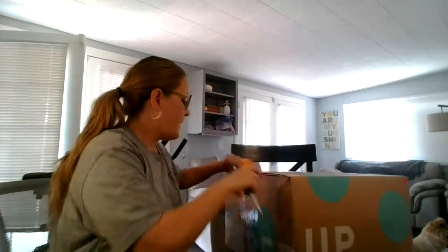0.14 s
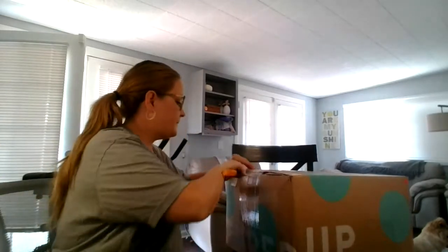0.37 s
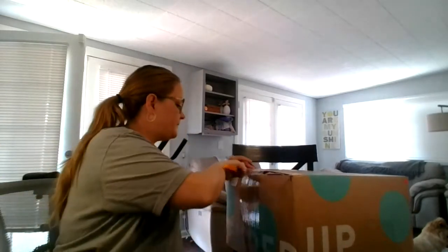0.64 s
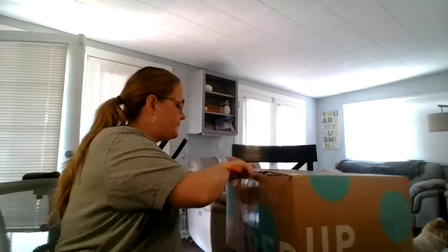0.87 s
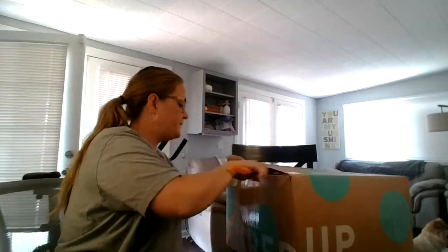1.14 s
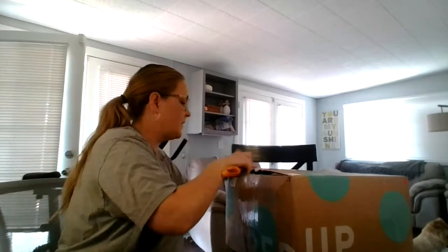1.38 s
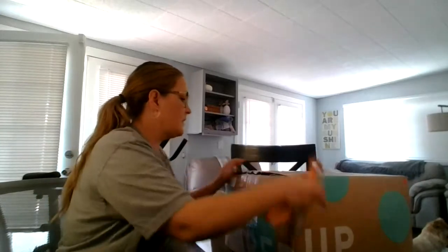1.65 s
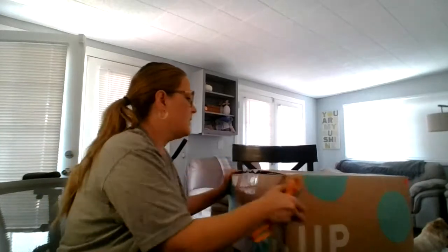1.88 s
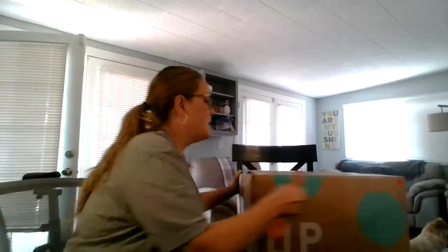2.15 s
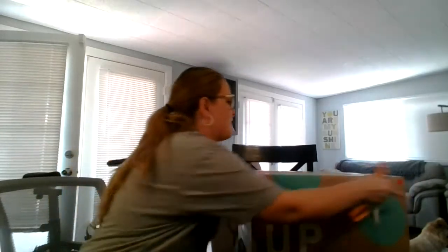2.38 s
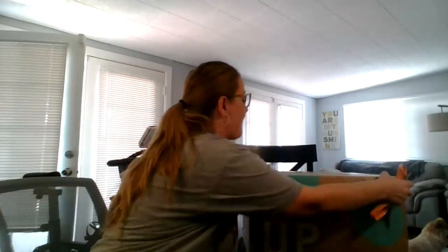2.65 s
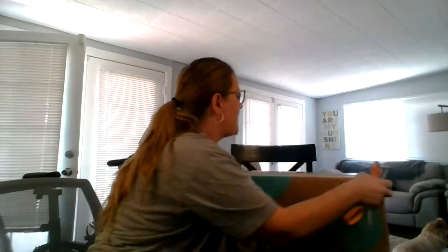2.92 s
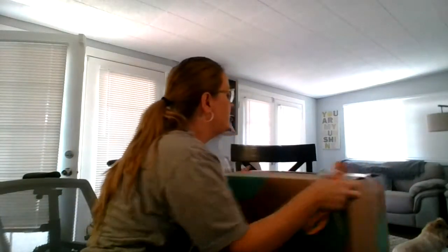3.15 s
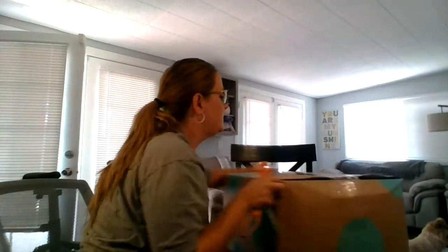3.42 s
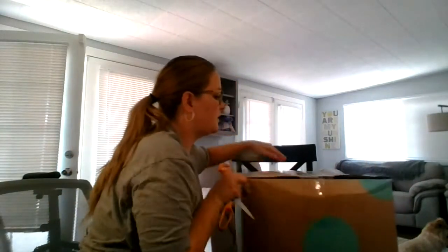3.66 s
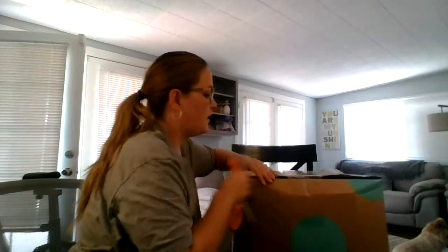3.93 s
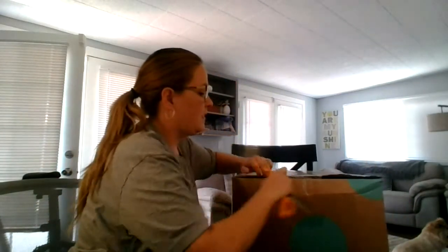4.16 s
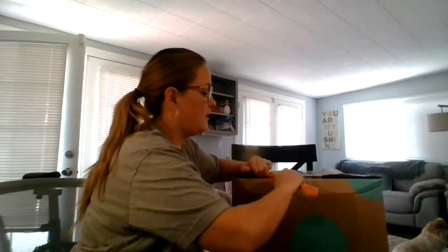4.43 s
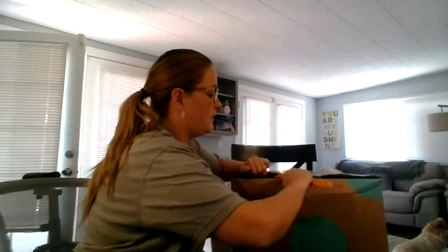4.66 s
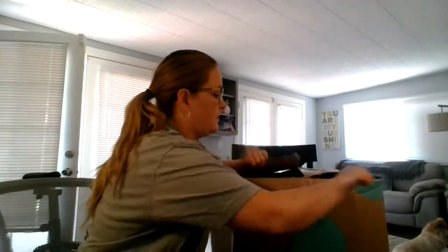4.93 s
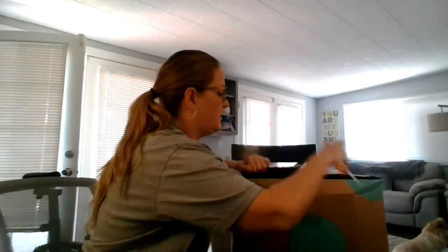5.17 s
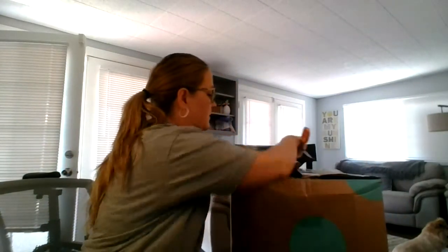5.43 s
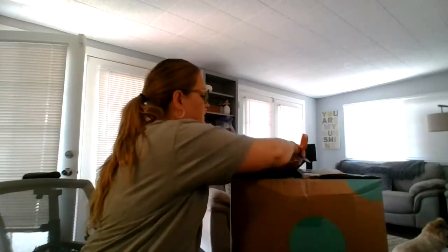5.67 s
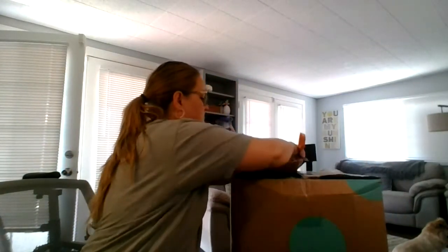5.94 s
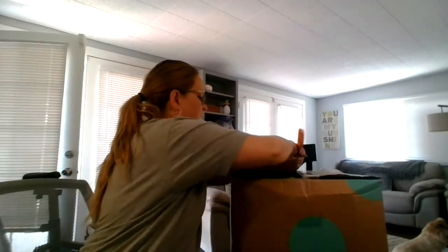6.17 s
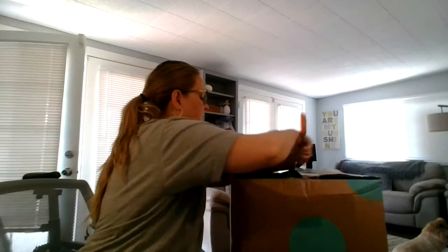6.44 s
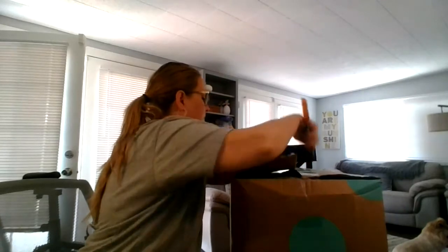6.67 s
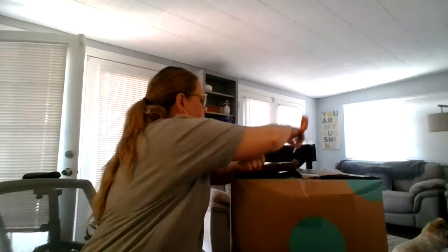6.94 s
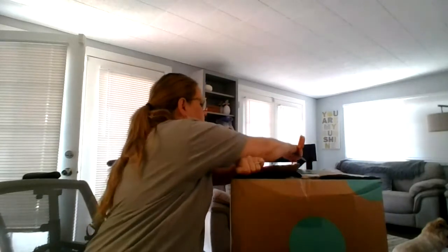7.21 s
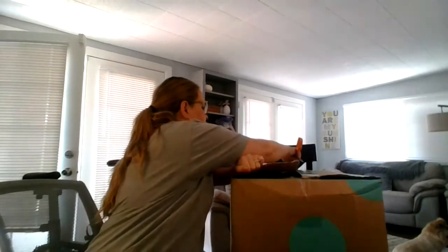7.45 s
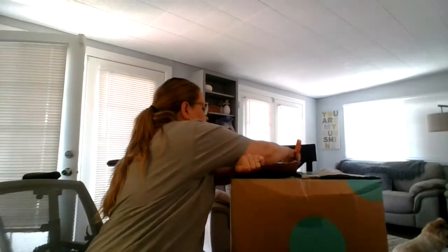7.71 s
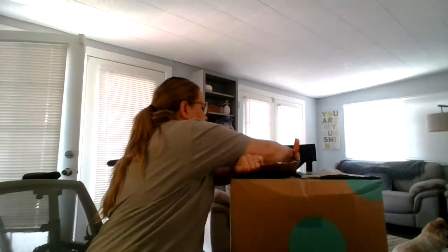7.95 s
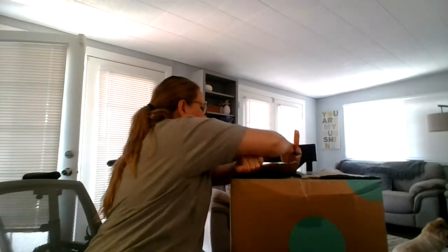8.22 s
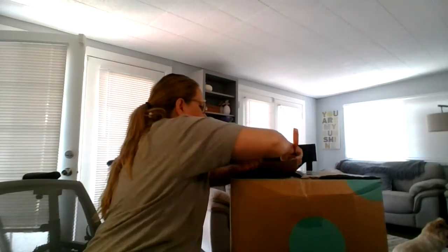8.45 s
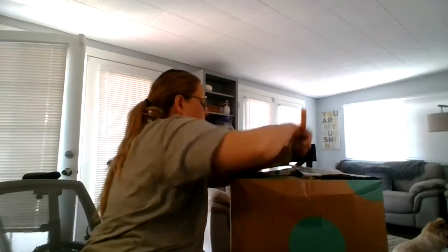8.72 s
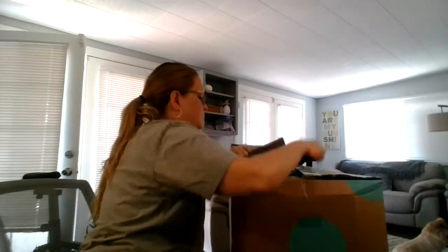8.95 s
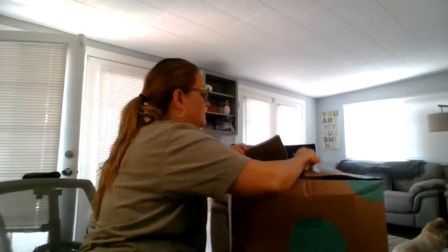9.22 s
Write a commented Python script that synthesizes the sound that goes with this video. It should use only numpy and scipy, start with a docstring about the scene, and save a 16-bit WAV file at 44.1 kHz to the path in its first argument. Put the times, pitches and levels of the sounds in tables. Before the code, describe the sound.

Close microphone in a furnished living room, short soft reflections, with a faint slowly swelling low hum, rumble and thin air throughout. From 0 to 0.6 s, small ticks and light touches on card. At 0.7 s a very loud, sharp tape crack bursts out, followed by more strong cracks and clumped tearing from 0.86 to 1.05 s, with hollow box knocks. From 1.2 to 4.6 s it is much quieter: dull hollow bumps near 1.8, 2.5, 2.8, 3.0 and 4.0 s, hands brushing card, faint scraping and tiny clicks. At 4.7 to 4.9 s, bright snaps, ripping and a short gritty scrape. Bumps at 5.0 and 5.3 s, modest tearing around 6.1 s, a deep thump at 6.4 s, then near calm. From 7.7 s handling resumes: a strong snap at 7.85 s, scrapes and brief rasps, a crackling cluster at 8.4 to 8.6 s, then fading tears and rubbing until about 9.3 s.

```python
"""Scissors slit the packing tape of a large cardboard box and hands pull the flaps open in a living room. Tape
snaps in sharp cracks with short card rings, tears in clumped noise and peels in gliding rasps; a bending flap
groans in low glides. Hands knock the hollow box, a bank of resonances; skin slides in hissing noise and a blade
scrapes in grains. An appliance hums on beating low tones over rumble and faint air; near echoes and a diffuse
tail make the room."""
import sys
import numpy as np
from scipy import signal
from scipy.fft import rfft, irfft, next_fast_len
from scipy.io import wavfile
from scipy.ndimage import uniform_filter1d

SR = 44100
rng = np.random.default_rng(int(sys.argv[2]) if len(sys.argv) > 2 else 0)


def int16_out(signal):
    """Quantize to a 16-bit WAV file."""
    q = np.round(np.clip(np.atleast_2d(signal).T, -1, 1) * 32767)
    wavfile.write(sys.argv[1], SR, q.astype(np.int16))


def voltage_ratio(level):
    """Linear amplitude factor for a level in decibels (scalar or array-like)."""
    return 10 ** (np.asarray(level, float) / 20)


N = 411894

# Tape and card giving way. Each row: start in seconds, crack peak in dB, card ring peak in dB,
# tearing level in dB, tearing t60 in seconds (kept within 0.02 to 1; the steady sag comes on top).
SNAPS = [(.122, -37, -52, -66, .13), (0.2596, -34, -39, -49.5, 0.096), (.3002, -25, -40, -44.5, 0.056),
         (0.373, -37, -32, -43, 0.029), (0.463, -34, -65, -63, .1), (0.5658, -38, -45, -57, .13),
         (0.6879, 5, -12, -25.5, 0.081), (.6934, -15, -25, -31, 0.42), (0.8612, -13.5, -39, -41, 0.032),
         (.9061, -3, -25, -24, 0.28), (.9114, -2, -18.5, -24, 0.38), (.9815, -6, -26, -23.5, 0.078),
         (.9875, -11, -18, -30, .13), (1.0175, -18, -28, -28, .13), (1.0329, -2, -17, -28.5, 0.27),
         (1.1714, -38, -39, -40.5, 0.12), (1.295, -55, -48, -51, 0.39), (1.7715, -27, -50, -45.5, .13),
         (1.7944, -38, -54, -44, 0.61), (1.8494, -46, -32, -49.5, 0.18), (2.099, -51, -43.5, -57, .13),
         (2.499, -42, -38, -54.5, .13), (2.6072, -44, -37, -74, 0.098), (3.01, -40, -41, -67, .1),
         (3.553, -19, -40, -48, .13), (3.5833, -27, -38, -48, 0.2), (3.759, -51, -44, -70, .13),
         (3.7834, -36, -28, -40, 0.079), (3.9007, -37, -38.5, -47, .13), (4.108, -46, -37, -45, 0.18),
         (4.1361, -26, -31, -40.5, 0.03), (4.194, -38, -32, -50.5, 0.054), (4.282, -48, -57, -65, .24),
         (4.515, -46, -34, -62, 0.1), (4.589, -49, -62, -60.5, .13), (4.7055, -8.5, -13.5, -31, .13),
         (4.71, -12, -23, -25.5, 0.15), (4.7476, -16, -17.5, -38.5, 0.29), (4.8515, -35, -39, -40, .13),
         (4.8602, -30, -24, -29, 0.15), (4.874, -18, -13.5, -33, 0.1), (4.9132, -22, -27, -25.5, 0.061),
         (4.9214, -26, -22, -32.5, 0.17), (5.4878, -52, -42, -49.5, 0.59), (5.8506, -39, -60, -55.5, 0.69),
         (5.9226, -29, -41, -47, 0.18), (5.9652, -49, -40, -65, 0.09), (6.0633, -18, -38, -39, 0.22),
         (6.1695, -25, -33, -29.5, .13), (6.177, -24, -25, -33.5, 0.3), (6.3215, -37, -58, -48.5, 0.1),
         (6.465, -25.5, -56, -51, .083), (6.539, -42, -50, -46.5, 0.15), (6.804, -37, -50, -79, 0.081),
         (7.4729, -40, -68, -70, .15), (7.5416, -33.5, -57, -56, .13), (7.568, -40, -52, -51.5, 0.13),
         (7.737, -18, -37, -41.5, 0.18), (7.8411, -29, -38, -31, 0.11), (7.8475, -7.5, -19.5, -34.5, 0.25),
         (8.008, -30, -35, -44, .34), (8.1998, -27, -32, -36.5, 0.76), (8.4384, -22, -35, -33.5, 0.31),
         (8.483, -14, -45, -32, .15), (8.5251, -8, -32, -29, 0.15), (8.554, -9, -49, -30.5, 0.053),
         (8.6914, -24, -55, -44.5, 0.74), (8.8258, -30, -59, -44, 0.18), (8.9698, -29, -45, -46.5, 0.16),
         (9.0900, -36, -58, -46.5, 0.46)]
# Hands and flaps knocking the box. Each row: start in seconds, peak in dB,
# gain of the hard push and gain of the deep push, both in dB against the soft push.
KNOCKS = [(.177, -46.5, -8, 0), (0.262, -42.5, -23, -6), (0.372, -47, 0, -14), (.686, -31, -3, -15),
          (.904, -21, 6.5, -14), (0.983, -18, -3.5, -7), (1.035, -14, 5.5, -4), (1.544, -32.5, -7.5, 1),
          (1.772, -26.5, -4, -33), (1.8, -33.5, -3.5, -24), (2.344, -35, 1, 2), (2.5, -24, -0.5, -17),
          (2.606, -34, 2.5, -12), (2.768, -25, 1, -22), (2.819, -36.5, -2, -4), (2.917, -41, 1, -1),
          (3.008, -27.5, -0.5, -6), (3.062, -39, -2, -4), (3.554, -40.5, -2, -3.5), (3.58, -42.5, 12, 6),
          (3.757, -40, 7, -13), (4.007, -28, -0.5, -6), (4.06, -39.5, -12, -8), (4.186, -53, 22, -1),
          (4.51, -44.5, 1.5, -14), (4.703, -19.5, 0, -5.5), (4.855, -26, 5, -5), (4.915, -27, 1.5, -3),
          (5.004, -27, -1.5, -2), (5.286, -28, 0, -11), (6.063, -31, 1.5, -3), (6.172, -25.5, 13, 3),
          (6.206, -31, -4, -6), (6.377, -22, -7, 2.5), (6.53, -38, 0, -21), (7.103, -38.5, 6, -3),
          (7.746, -34.5, -1, -11), (7.846, -28.5, -1, -3), (8.007, -36, -2, -7), (8.44, -28, 2, -18),
          (8.48, -30.5, -1, 5)]
# Rasps of tape and card peeling from the flap, and two longer low glides as the flap bends. # Each row: start
# in seconds, length in seconds, # starting pitch in Hz, glide in Hz per second, level in dB.
PEELS = [(7.95, .25, 924, 302, -50), (8.0, 0.12, 1220, -300, -57), (7.852, 0.0088, 4890, 100, -38),
         (8.005, 0.022, 2790, 100, -47), (8.005, 0.035, 2140, -100, -49), (8.215, .02, 2920, -2000, -42),
         (8.29, 0.024, 2320, 100, -47), (8.37, 0.068, 2300, -5000, -48.5), (8.484, 0.013, 2680, 114, -43),
         (8.52, 0.01, 2646, -100, -39), (8.53, 0.03, 4360, 100, -41.5), (8.69, 0.0098, 4700, 100, -47.5),
         (8.972, 0.0077, 3770, 101.5, -51.5), (9.12, 0.02, 1950, -100, -54)]
# Skin sliding on card. Each row: start in seconds, length in seconds, level in dB, lift-off in dB per second.
SLIDES = [(0, 0.027, -57.5, 62), (0.162, 0.19, -56, 38), (.76, .2, -53, 44), (1.0, 0.16, -47.5, 189),
          (1.28, 0.14, -58.5, 45), (1.58, 0.32, -49, 47), (2.483, 0.51, -54.5, 45), (2.737, 0.19, -53, 40),
          (2.888, 0.17, -48.5, 23), (3.16, 0.6, -58.5, 17), (3.772, 0.036, -50.5, 150),
          (3.892, .05, -54, 100), (4.001, 0.033, -50, 200), (4.102, 0.074, -52.5, 100),
          (4.278, 0.091, -48, 99), (4.854, 0.093, -36, 200), (5.07, 0.1, -59.5, 125),
          (5.508, 0.19, -52, 66), (5.896, 0.24, -58.5, 35), (6.155, 0.078, -51, 43),
          (6.32, 0.094, -48.5, 72), (6.962, 0.049, -53.5, 79), (7.54, 0.03, -61.5, 103),
          (7.878, 0.15, -46.5, 79), (8.177, 0.26, -42.5, 70), (8.42, 0.087, -40.5, 63),
          (8.8, .2, -52.5, 42), (9.082, .04, -41, 159), (9.18, .3, -52.5, 40)]
# Blade and tape scraping along the box. Each row: start in seconds, length in seconds,
# scraping level in dB, level of the creaking walls in dB.
SCRAPES = [(0, 0.25, -65.5, -65), (0.265, .13, -56.5, -79), (0.504, 0.22, -65, -65),
           (0.73, 0.064, -57, -52), (.97, .06, -61, -63), (1.273, 0.71, -69.5, -67), (1.6, 0.05, -59, -59),
           (1.74, 0.22, -62.5, -67), (2.04, 0.029, -57.5, -67), (2.321, .07, -54.5, -65),
           (2.523, 0.27, -75, -63), (2.77, 0.24, -55, -53.5), (3.05, 0.56, -62.5, -64.5),
           (3.535, 0.79, -64.5, -66), (4.175, 0.033, -48.5, -47.5), (4.494, 0.036, -64, -60),
           (4.851, 0.067, -35.5, -36), (4.91, 0.049, -73, -45), (5.03, 0.045, -74, -75),
           (5.46, 0.23, -66, -61.5), (5.878, 0.22, -65, -56), (6.13, 0.32, -58, -53.5),
           (6.397, 0.036, -52, -58), (7.745, 0.16, -85, -49), (7.9, 0.092, -49, -55),
           (8.02, 0.16, -47.5, -48), (8.184, 0.092, -41, -47.5), (8.3, 0.31, -49, -47.5),
           (8.696, 0.059, -57, -59), (8.942, .45, -61.5, -63.5)]
# Idle hands: the resting levels in dB of sliding, scraping and creaking, in that order.
RESTING_DB = [-76.5, -74.5, -67.5]
# Resonances of the hollow box. Each row: frequency in Hz, width in Hz, relative level in dB.
BOX_MODES = [(126, 27.6, 4), (210.5, 85, 2.5), (237, 86.5, 4.5), (311.4, 72, 1), (381, 67, -1.5),
             (443, 90, 1), (530, 140, -1), (633, 77, 5), (655, 98, 1.5), (1008, 64, -13), (1177, 100, -17),
             (2010, 33, -15.5)]
# Spectra of tearing, sliding, scraping and room air. Each row: frequency in Hz, relative level in dB per Hz.
TEAR_SPECTRUM = [(180, -6), (300, -11.5), (1010, -4), (1390, -5.5), (1640, -3.5), (2070, -2.5),
                 (7820, -3.5), (9390, -6), (12000, -4), (15700, -5.5), (16100, -37)]
SLIDE_SPECTRUM = [(1760, -4), (3000, -3), (6000, -2), (6900, 1), (10400, 0), (13400, -0.5), (15700, 1.5),
                  (16100, -36)]
SCRAPE_SPECTRUM = [(470, -13), (800, -2), (931, -4.5), (1010, -4), (2180, -7.5), (2440, -13), (2810, -7),
                   (3400, -13.5), (9000, -13.5), (11700, -99), (19800, -120)]
AIR_SPECTRUM = [(55, 0), (70, 1), (108, 0), (150, 0), (199, 1), (336, -0.5), (483, -13.5), (1200, -10),
                (1370, -13.5), (4090, -20.5), (14900, -24.5), (16000, -15.5)]
# Mains lines of the hum. Each row: frequency in Hz, mean level in dB.
MAINS = [(120.3, -61), (180.4, -74.5), (240.6, -75)]
# Width of the stereo noise. Each row: frequency in Hz, left-right likeness from 0 to 1.
LIKENESS = [(60, 0.96), (500, 0.83), (1000, 0.79), (2000, 0.33), (5500, 0.15), (7500, 1), (12000, 0.94)]
# Decay curve of the room, which the tail takes a share of. Each row: frequency in Hz, t60 in seconds.
ROOM_T60 = [(100, 0.8), (260, 0.28), (700, 0.38), (1840, 0.38), (4850, 0.28), (12800, 0.089)]
# Nearest surfaces. Each row: delay in seconds, level in dB before panning.
ECHOES = [(.0055, -18.5), (.0065, -32.5), (.012, -45)]
EDGES_HZ = 60 * 2 ** np.arange(0, 8.3, .5)  # half-octave bands

CARD_HZ, CARD_SPREAD_OCTAVES = 890, 0.24  # each snap rings the card at a pitch of its own near this
TEAR_HOLD_S = 0.018  # each tear stays near full level this long, then dies away
TEAR_RISE_S = 0.00082  # rise of the strongest tear
RISE_DB_PER_DB = -0.6  # weaker tears start faster: dB of rise time per dB below the strongest
SHUDDER_T60_S = 0.13  # shudder after a knock that peaks at -30 dB
LONGER_PER_DB = 0.49  # lighter contacts drag and shudder longer: dB of t60 per dB below -30
PEEL_RISE_DB_PER_S, PEEL_FALL_DB_PER_S = 1500, 400
TOUCH_S, SCRAPE_LIFT_DB_PER_S = .04, 130.5  # a stroke swells in, holds, then lifts off
# Two motors run nearly in step around HUM_HZ, so the tone swells and fades
HUM_HZ, HUM_DB, WEAKER_MOTOR_DB = 58.46, -45, -2.5
BEAT_S, FIRST_FADE_S = 2.34, 1.45
DRONE_HZ, DRONE_WIDTH_HZ, DRONE_DB = 49.06, 2.06, -54
RUMBLE_DB, AIR_DB = -45.5, -60


def rms_one(x):
    """Scale to rms 1."""
    return x / np.sqrt(np.mean(x ** 2) + 1e-20)


def at_hz(points, hz):
    """Read a table on a log-frequency axis."""
    table = np.array(points)
    return np.interp(np.log(hz), np.log(table[:, 0]), table[:, 1])


def drift(rate):
    """Slow random wander of spread 1, noise smoothed by two equal poles at rate Hz."""
    r = np.exp(-80 * np.pi * rate / SR)  # one value every 40 samples
    slow = signal.lfilter([1], [1, -2 * r, r * r], rng.standard_normal(N // 40 + 2002))[2000:]
    return np.interp(np.arange(N) / 40, np.arange(len(slow)), rms_one(slow - slow.mean()))


def cut(x, hz, kind, order=2):
    """Butterworth filter."""
    return signal.sosfilt(signal.butter(order, hz, kind, fs=SR, output="sos"), x)


def colour(x, spectrum):
    """Shape a sound to a spectrum table, falling steeply below its first point."""
    size = next_fast_len(x.shape[-1])
    hz = np.maximum(np.arange(size // 2 + 1) * SR / size, 1)
    low_end = 1 / np.sqrt(1 + (spectrum[0][0] / hz) ** 6)
    gain = voltage_ratio(at_hz(spectrum, hz)) * low_end
    gain = gain / np.sqrt(np.mean(gain ** 2))
    return irfft(rfft(x, size) * gain, size)[..., :x.shape[-1]]


def stereo_noise(size, t60_share=None, patchy_db=0):
    """Half-octave noise bands with a set left-right likeness; they may die away or flicker in level."""
    out, white, s = 0, rng.standard_normal((2, 2, size)), np.arange(size) / SR
    for k, (low, high) in enumerate(zip(EDGES_HZ, EDGES_HZ[1:])):
        mid, side = cut(white[k % 2], [low, high], "band")  # neighbouring bands use separate noise
        hz = np.sqrt(low * high)
        alike = np.clip(at_hz(LIKENESS, hz), 0, 1)
        fade = 1
        if t60_share:
            fade = voltage_ratio(-60 * s / (t60_share * at_hz(ROOM_T60, hz)))
        if patchy_db:
            fade = voltage_ratio(patchy_db * drift(12.7))
        out = out + fade * (np.sqrt(1 + alike) * mid + np.sqrt(1 - alike) * side * [[1], [-1]])
    return out


def grains(per_s, spread_db):
    """Random clicks of uneven size and either sign, rms 1."""
    sizes = voltage_ratio(spread_db * np.minimum(rng.exponential(1, N), 5)) * rng.choice([-1, 1], N)
    return rms_one(sizes * (rng.random(N) < per_s / SR))


def snaps():
    """Sudden release of tape: a sub-millisecond crack, a short card ring, then fibres and glue tearing in grains."""
    s, peak_db, ring_db, tear_db, t60 = np.transpose(SNAPS)
    ring_hz = CARD_HZ * 2 ** (CARD_SPREAD_OCTAVES * rng.standard_normal(len(s)))
    cracks, age = np.zeros(N), np.arange(900) / SR
    noises = rng.standard_normal((len(s), 2, len(age)))
    starts = (s * SR).astype(int)
    for i, sharp, dull, hz, (a, b) in zip(starts, voltage_ratio(peak_db), voltage_ratio(ring_db), ring_hz, noises):
        crack = cut(a * age * np.exp(-age / 0.00023), [2200, 17000], "band")
        ring = cut(b * np.exp(-age * hz / 2.05), [hz / 1.53, hz * 1.83], "band")
        cracks[i:i + len(age)] += sharp * crack / np.abs(crack).max()
        cracks[i:i + len(age)] += dull * ring / np.abs(ring).max()
    # the tear runs along the seam, so it is wide; its grains come in clumps
    clumps = uniform_filter1d(np.abs(grains(2500, spread_db=3.0)), size=40)
    fibres = stereo_noise(N, patchy_db=1.2) * (0.15 + clumps)
    tearing = rms_one(colour(fibres, TEAR_SPECTRUM)) * voltage_ratio(2 * drift(55))
    return cracks, tearing * bursts(s, tear_db, TEAR_HOLD_S, np.clip(t60, .02, 1))


def bursts(times, levels_db, hold, t60s):
    """Tearing envelopes that jump up, sag while held, then die away; the loudest rules."""
    out = np.zeros(N)
    for s, level_db, t60 in zip(times, levels_db, t60s):
        i = round(s * SR)
        age = np.arange(min(round((hold + t60) * SR), N - i)) / SR
        rise_s = TEAR_RISE_S * voltage_ratio(RISE_DB_PER_DB * (max(levels_db) - level_db))
        fall_db = 60 * age + 60 * np.maximum(age - hold, 0) / t60
        shape = voltage_ratio(level_db - fall_db) * np.minimum(age / rise_s, 1)
        out[i:i + len(age)] = np.maximum(out[i:i + len(age)], shape)
    return out


def peeling():
    """Uneven slips excite a resonance that glides through each rasp of peeling tape or bend of the flap."""
    out, lead = np.zeros(N), round(.1 * SR)
    slips = rms_one(cut(grains(1100, spread_db=-1.0), 190, "low")) * voltage_ratio(2.6 * drift(25))
    for k, (s, length, hz, glide, level_db) in enumerate(PEELS):
        age = np.arange(-lead, lead + round(length * SR)) / SR
        at = round(s * SR) - lead + np.arange(len(age))
        fall_db = -PEEL_FALL_DB_PER_S * np.maximum(age - length, 0)
        shape_db = level_db + np.minimum(PEEL_RISE_DB_PER_S * age, fall_db)
        tone = np.sqrt(2) * np.sin(2 * np.pi * (hz * age + glide * age ** 2 / 2))
        out[at] += slips[at - k * lead] * tone * voltage_ratio(shape_db)  # each rasp reads its slips at another offset
    return out


def knocks():
    """A contact and a short shudder shake the box: its weight moves the deep mode, the palm the low, edges the high."""
    out, shake, age = np.zeros(N), grains(1500, spread_db=2.5), np.arange(round(.4 * SR)) / SR
    for s, peak_db, hard_db, deep_db in KNOCKS:
        i = round(s * SR)
        t60 = SHUDDER_T60_S * voltage_ratio(LONGER_PER_DB * (-30 - peak_db))
        push = voltage_ratio(-21.5) * rms_one(shake[i:i + len(age)]) * voltage_ratio(-60 * age / t60)
        push[0] += 1  # the contact itself
        deep = cut(push, 150, "low")
        soft = cut(push, [170, 520], "band")
        hard = cut(push, [520, 1300], "band")
        ring = box(soft + voltage_ratio(hard_db) * hard + voltage_ratio(deep_db) * deep)
        out[i:i + len(age)] += voltage_ratio(peak_db) * ring / np.abs(ring).max()
    return out


def box(force):
    """The hollow box rings in parallel two-pole resonances of alternating sign."""
    out = 0
    for k, (hz, width_hz, level_db) in enumerate(BOX_MODES):
        r = np.exp(-np.pi * width_hz / SR)
        zeros = [(1 - r * r) / 2, 0, (r * r - 1) / 2]
        poles = [1, -2 * r * np.cos(2 * np.pi * hz / SR), r * r]
        out = out + (-1) ** k * voltage_ratio(level_db) * signal.lfilter(zeros, poles, force + 1e-18)
    return out


def sliding():
    """Skin hisses on card: wide, patchy noise that flickers under each stroke."""
    wide = rms_one(stereo_noise(N, patchy_db=0.87))
    hiss = rms_one(colour(wide, SLIDE_SPECTRUM)) * voltage_ratio(2.2 * drift(17))
    return hiss * strokes(*np.transpose(SLIDES), RESTING_DB[0])


def scraping():
    """The blade scrapes in dense grains and sets the box walls creaking in their resonances."""
    start, length, scrape_db, creak_db = np.transpose(SCRAPES)
    lift = np.full(len(start), SCRAPE_LIFT_DB_PER_S)
    grit = colour(grains(5000, spread_db=2.0), SCRAPE_SPECTRUM) * voltage_ratio(2.0 * drift(25))
    creak = rms_one(box(grains(1500, spread_db=6.0))) * voltage_ratio(0.83 * drift(7.4))
    grit = grit * strokes(start, length, scrape_db, lift, RESTING_DB[1])
    return grit + creak * strokes(start, length, creak_db, lift, RESTING_DB[2])


def strokes(starts, lengths, levels_db, lifts, rest_db):
    """Envelope of strokes that swell in, hold and lift off, above a resting level; powers add."""
    s, power = np.arange(0, N + 64, 64) / SR, voltage_ratio(rest_db) ** 2
    for start, length, level_db, lift in zip(starts, lengths, levels_db, lifts):
        swell = np.clip((s - start) / TOUCH_S + .5, 0, 1)
        lift_db = lift * np.maximum(s - start - length, 0)
        power = power + (swell * voltage_ratio(level_db - lift_db)) ** 2
    return np.interp(np.arange(N) / SR, s, np.sqrt(power))


def room(x):
    """A few near echoes and a diffuse tail dying band by band; the tail changes as hands and flaps move."""
    size, out = round(.4 * SR), np.zeros((2, N))
    for k, (lag, level_db) in enumerate(ECHOES):
        pan = np.array([[1.15], [.85]])[::(-1) ** k]  # alternate sides
        out += voltage_ratio(level_db) * pan * np.roll(x, round(lag * SR))
    step = 8192
    window = signal.windows.hann(2 * step, sym=False)
    build_up = np.minimum(np.arange(size) / (0.0062 * SR), 1)
    tails = stereo_noise(size, t60_share=0.75) * build_up * voltage_ratio(-34.0)
    # every overlapping piece of sound gets a tail with its own random sign flips
    signs = rng.choice([-1, 1], (N // step + 2, size // 100 + 1))
    padded = np.pad(x, (step, 2 * step))
    wide = np.zeros((2, len(padded) + size + 2 * step))
    for k, flips in enumerate(signs):
        tail = tails * uniform_filter1d(np.repeat(flips, 100)[:size] * 1., size=40)
        piece = padded[k * step:(k + 2) * step]
        reply = signal.fftconvolve((piece * window[:len(piece)])[None], tail, axes=1)
        wide[:, k * step:k * step + reply.shape[1]] += reply
    return out + wide[:, step:step + N]


def appliance_hum():
    """Two motors nearly in step beat slowly, beside wavering mains lines and a narrow noise drone."""
    s = np.arange(N) / SR
    slip = np.pi * (s - FIRST_FADE_S) / BEAT_S
    turn = 2 * np.pi * np.cumsum(HUM_HZ * (1 + 0.0032 * drift(3))) / SR
    motors = np.sin(turn + slip) - voltage_ratio(WEAKER_MOTOR_DB) * np.sin(turn - slip)
    motors = motors * voltage_ratio(1.7 * drift(1.4))
    mains = sum(voltage_ratio(level_db + 3.9 * drift(3.4)) * np.sin(2 * np.pi * hz * s) for hz, level_db in MAINS)
    band = [DRONE_HZ - DRONE_WIDTH_HZ / 2, DRONE_HZ + DRONE_WIDTH_HZ / 2]
    drone = rms_one(cut(rng.standard_normal(N + SR), band, "band")[SR:])  # skip the filter's build-up
    return motors * voltage_ratio(HUM_DB) + mains + drone * voltage_ratio(DRONE_DB)


def rumble():
    """Low-band noise, almost mono, with a dip where the room is weak between its lowest modes."""
    mid, side = cut(rng.standard_normal((2, N)), [16, 54], "band", order=4)
    notched = signal.lfilter(*signal.iirnotch(39, 1.5, fs=SR), mid)
    mid = mid - .5 * (mid - notched)
    return rms_one(mid + voltage_ratio(-22.5) * side * [[1], [-1]]) * voltage_ratio(RUMBLE_DB)


def room_air():
    """Faint steady stereo noise with the spectrum of the room air."""
    noise = stereo_noise(N)[:, ::-1]  # reversed in time
    return rms_one(colour(noise, AIR_SPECTRUM)) * voltage_ratio(AIR_DB)


def scene():
    """Mix all layers; the direct box sounds arrive two samples later on the right."""
    cracks, tearing = snaps()
    near = cracks + knocks() + scraping() + peeling()
    direct = np.array([near, np.roll(near, 2)])
    reverb = room(near + tearing.mean(axis=0))
    return direct + tearing + reverb + sliding() + appliance_hum() + rumble() + room_air()


def top_cut(x):
    """Nothing passes above the cut-off."""
    return signal.sosfilt(signal.butter(12, 16970, fs=SR, output="sos"), x)


def record(dry):
    """The top of the band is cut and peaks are rounded by soft saturation."""
    low_pass = signal.cheby2(10, 25, 16300, fs=SR, output="sos")
    taken = signal.sosfilt(low_pass, dry)
    return top_cut(0.95 * np.tanh(taken / 0.96))


dry = scene()
out = record(dry)
int16_out(out)
```